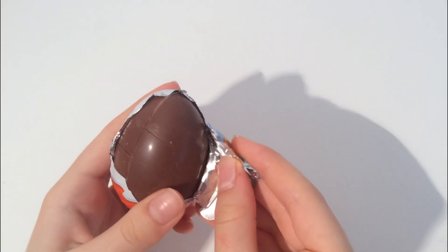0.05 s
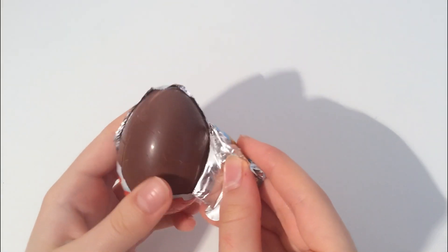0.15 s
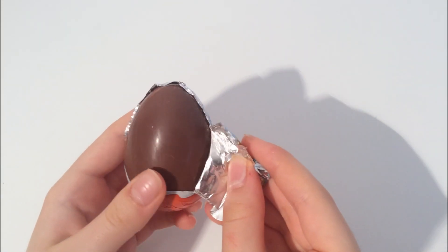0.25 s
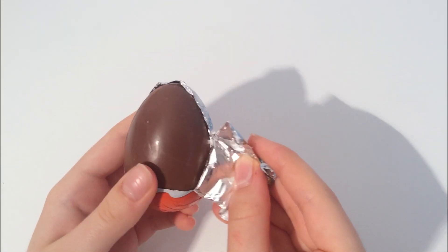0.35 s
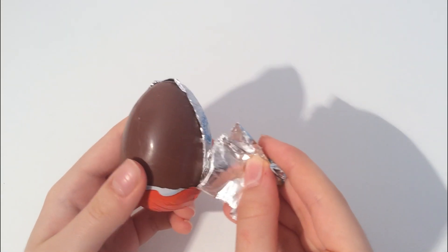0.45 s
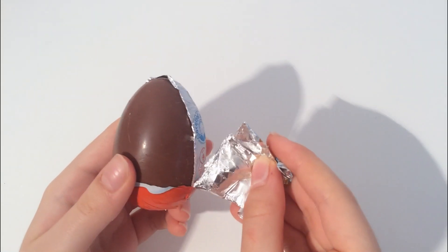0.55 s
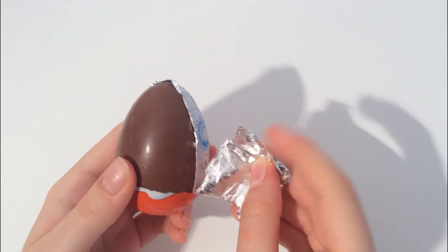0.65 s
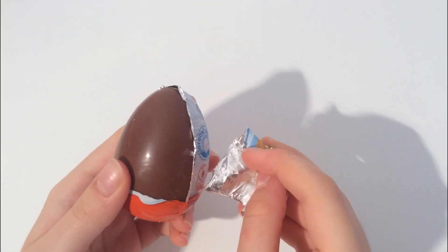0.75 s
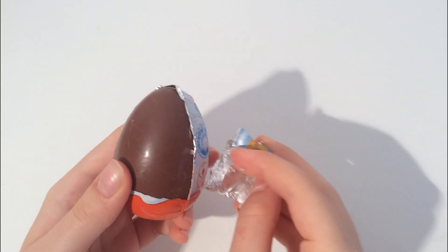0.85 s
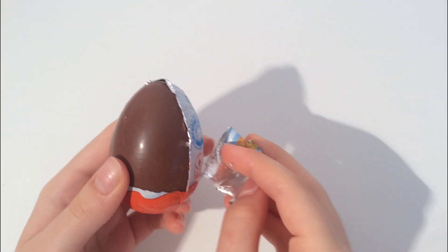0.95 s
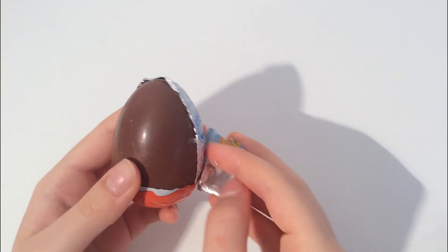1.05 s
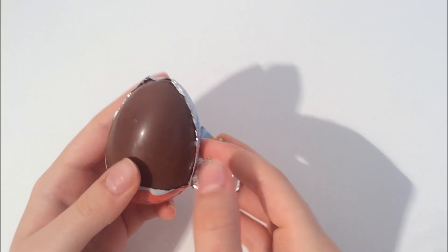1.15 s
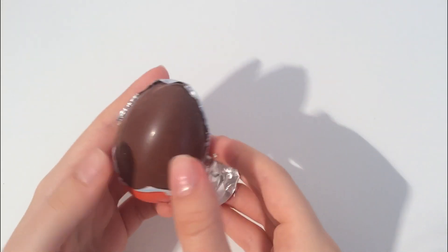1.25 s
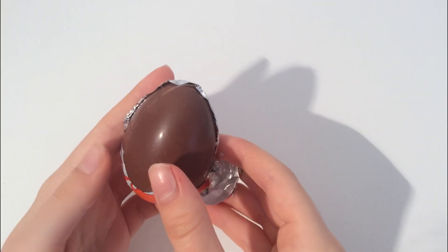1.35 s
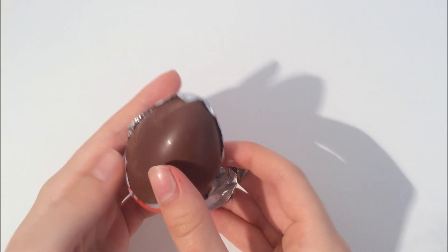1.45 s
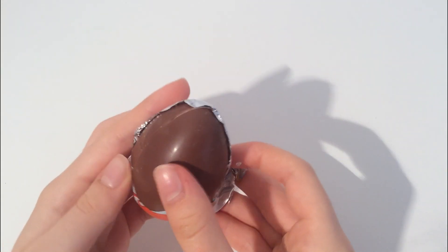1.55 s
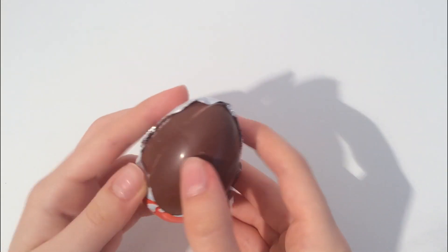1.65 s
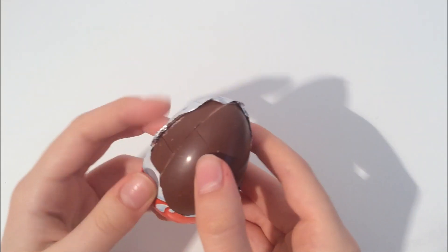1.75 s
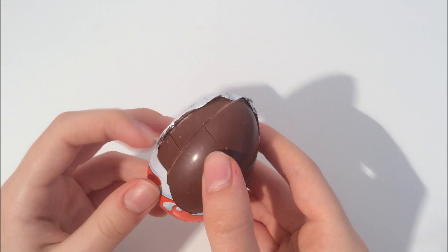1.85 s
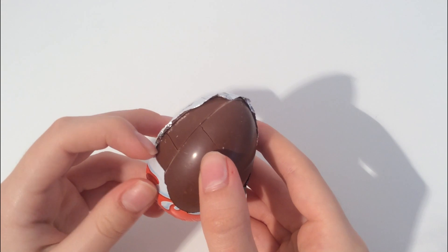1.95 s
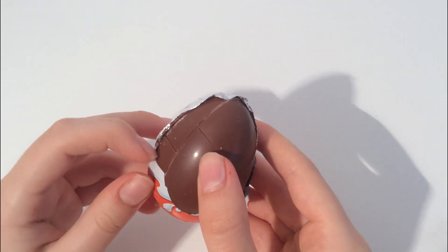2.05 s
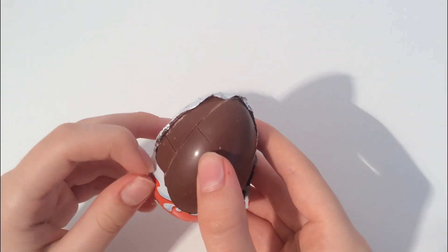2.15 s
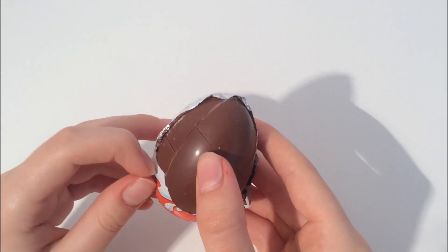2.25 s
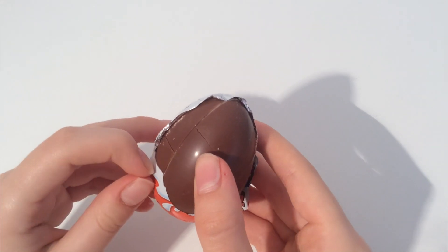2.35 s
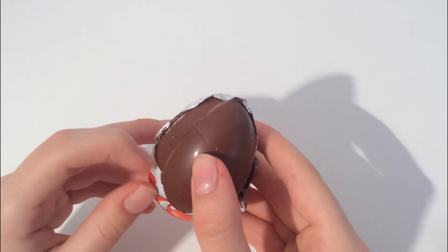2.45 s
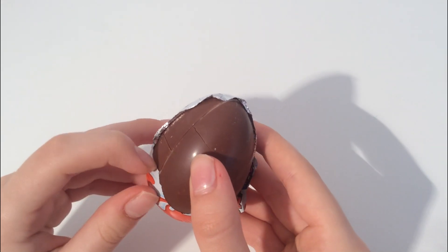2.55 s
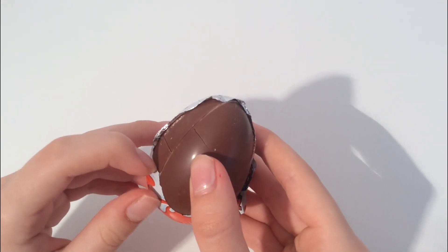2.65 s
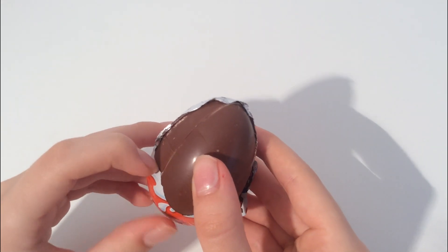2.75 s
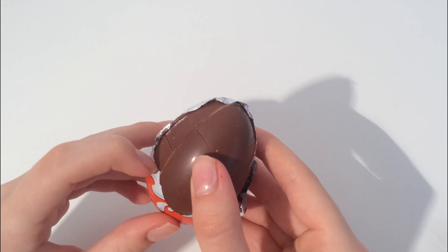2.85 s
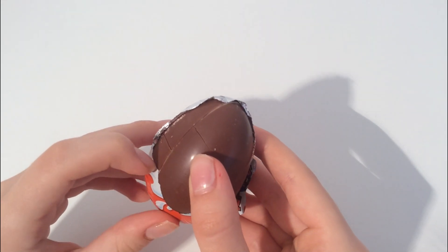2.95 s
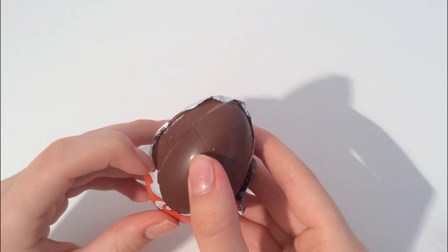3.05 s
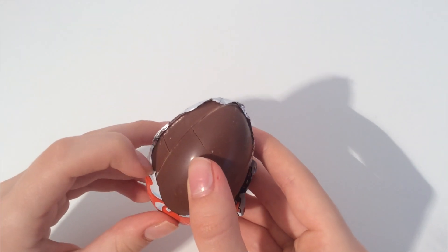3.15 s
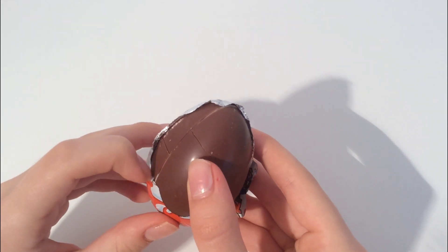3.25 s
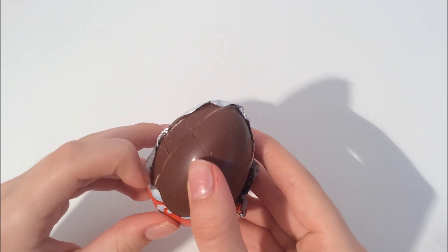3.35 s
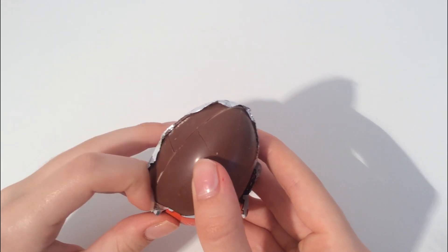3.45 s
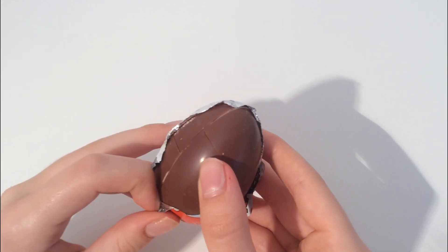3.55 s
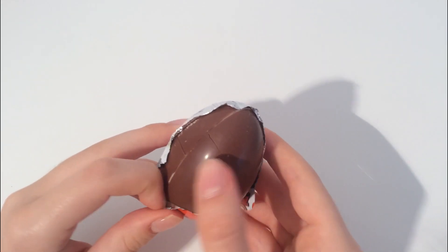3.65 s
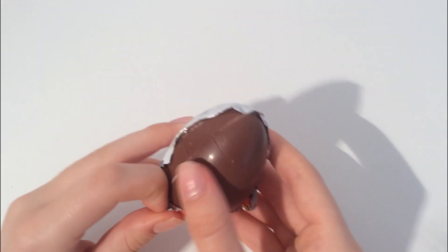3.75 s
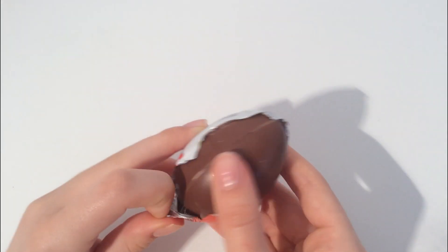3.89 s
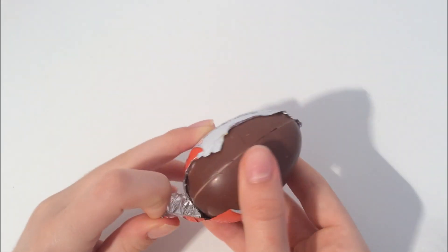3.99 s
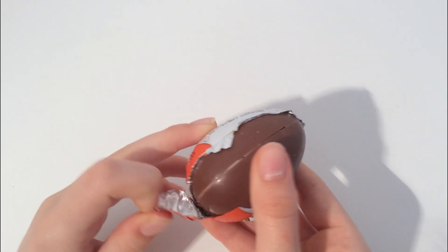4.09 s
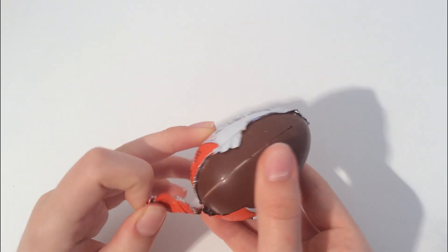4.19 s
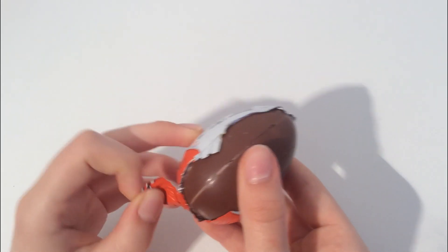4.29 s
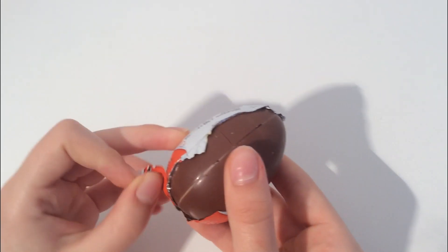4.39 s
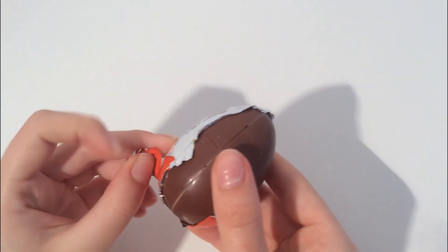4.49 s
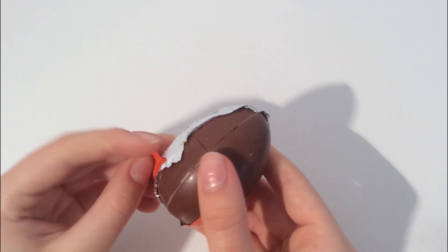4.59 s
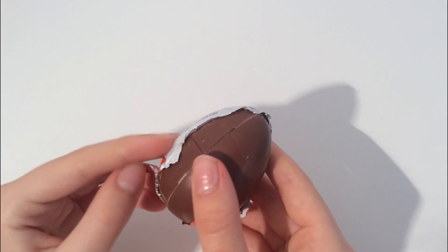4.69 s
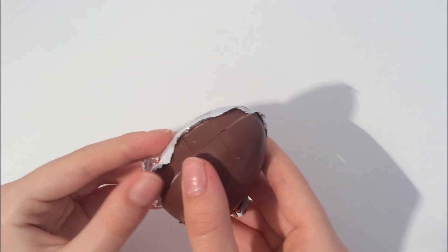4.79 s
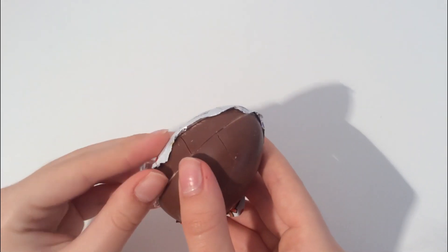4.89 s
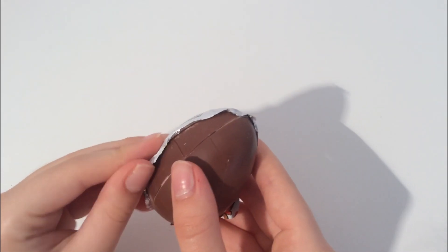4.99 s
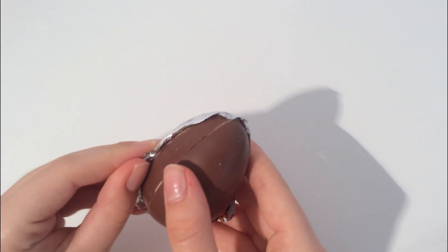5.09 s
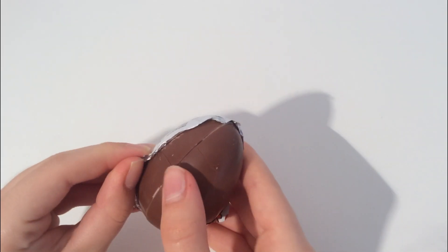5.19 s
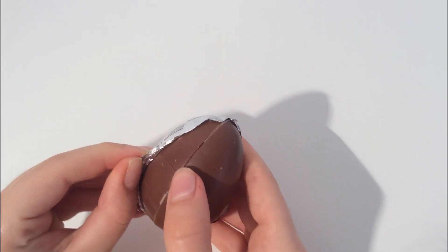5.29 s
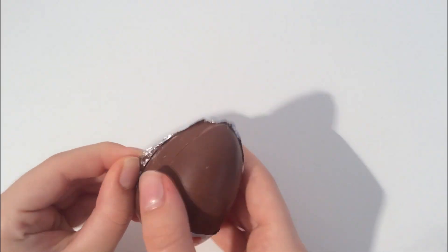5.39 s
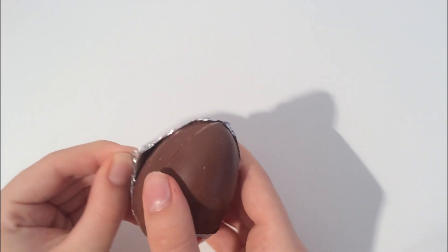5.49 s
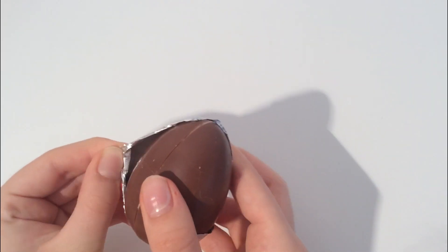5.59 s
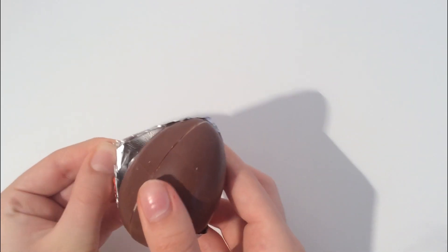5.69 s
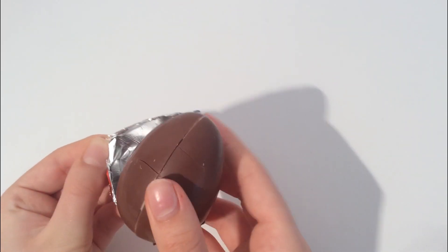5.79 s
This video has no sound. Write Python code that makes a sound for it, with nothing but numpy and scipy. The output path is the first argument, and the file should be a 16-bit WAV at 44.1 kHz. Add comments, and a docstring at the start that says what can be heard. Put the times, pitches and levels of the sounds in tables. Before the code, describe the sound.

Close to the microphone in a small quiet room, fingers peel thin foil from a hollow chocolate egg. Dense crinkling and bright clicks come in quick pulls for nearly two seconds, then almost stop. One isolated hard crack rings briefly in the lull, and shorter crackling bursts return, strongest around four and a half seconds and again near the end. Soft hiss and a faint low hum stay underneath.

```python
"""Foil peeled from a hollow chocolate egg

Fingers peel thin foil off the egg, close to a microphone in a quiet room with hiss and a faint hum.
Creases buckle one by one as sharp ringing clicks; between them the foil slides and tears, a fine
crackle of random facet clicks shaped by the pull. Pockets of foil pop as resonances, one hard crack
sets the crowded modes of the wrapper ringing, and fingers bump the shell in soft, low, damped thuds."""
import sys
import numpy as np
from scipy import signal
from scipy.fft import rfft, irfft
from scipy.io import wavfile
from scipy.ndimage import uniform_filter1d

SR = 44100
rng = np.random.default_rng(int(sys.argv[2]) if len(sys.argv) > 2 else 0)


def output_pcm(signal):
    """Save a mono or channel-first signal as 16-bit PCM at the path in sys.argv[1].

    Samples are clipped to [-1, 1] before scaling.
    """
    pcm = np.clip(np.atleast_2d(signal).T, -1, 1) * 32767
    wavfile.write(sys.argv[1], SR, np.round(pcm).astype(np.int16))


N = 257103  # length in samples

# large creases that snap: (time [s], level [dB], body near 1.5 kHz [dB], sheen near 12 kHz [dB],
# decay time of the scattered waves [ms])
CREASE_SNAPS = [(0.002, -29, -18.5, -15, 0.23), (0.0251, -29.5, -34, -2, 0.89), (0.0442, -31, -26, 2, 0.8),
                (0.1028, -38, 6.5, 2, 0.42), (0.2651, -37.5, -2, 0, 0.99), (0.2883, -33.5, 9.5, -6, 2.4),
                (0.2933, -37.5, 2, -15, 2.2), (0.3084, -36, 8, -10, 1.1), (0.3142, -32.5, 11.5, -1, 1.3),
                (0.3292, -37, 30, 14.5, 3.1), (0.3607, -35.5, 25, 6, 0.69), (0.3704, -32, 24.5, 15.5, 0.99),
                (0.421, -37, 23, 5, 0.56), (0.4248, -28.5, 7, -1, 0.94), (0.443, -34.5, -4, 6, 0.87),
                (0.4685, -27, 9.5, -31, 1), (0.5046, -37.5, 18, 1, 2.6), (0.5396, -35, -11, 1, 5.5),
                (0.663, -42, -6, -15, 3), (0.7297, -31.5, -1, -22, 3.4), (0.7356, -30.5, 5.5, -2, 1.6),
                (0.8451, -38, 5, -2, 3.3), (0.87, -36.5, 0.5, -5.5, 1.6), (0.9266, -35.5, -20, 11, 2),
                (1.017, -32, 5, 3, 0.97), (1.0273, -37, 6, -4, .8), (1.0526, -39, 14, -11, 6.7),
                (1.0894, -36, -4, 20, 1.5), (1.0939, -32.5, -0.5, -24, 0.71), (1.3161, -38.5, 7, -6, 1.9),
                (1.3594, -39.5, -1, -4, 2), (1.369, -37, 0, -8, 2.7), (1.4233, -30, -3.5, -5.5, 2),
                (1.4656, -34, 3.5, -7.5, 1.5), (1.6162, -47, 0, -12, 1.6), (1.6224, -33, -16, -17, 0.73),
                (1.6735, -29, -24, -6, 1.3), (1.6865, -34.5, 1, -5, 0.64), (1.694, -27.5, -1.5, 1.5, 6.5),
                (2.1332, -58, -12, -4, 2), (2.2241, -52.5, 0, 2.5, 0.9), (2.355, -44.5, -10, 7, 0.51),
                (2.5214, -48.5, 1, 0, 1.6), (2.7938, -30, -2, -3, 0.72), (2.7967, -38, -10, -16, 0.86),
                (3.1195, -52, -16, 11, 2), (3.226, -51.5, 3, 7, 0.86), (3.3344, -47, -5.5, -7, 0.42),
                (3.4134, -29, -11, 9, 2.8), (3.4375, -34, -12, 7.5, 4.7), (3.459, -32, 1, 9.5, 2.8),
                (3.7652, -34.5, -9.5, 2.5, 1.7), (3.8139, -48.5, 3, 3.5, 1.2),
                (3.8865, -34.5, 12, 12.5, 0.69), (3.9244, -26.5, 2, 3.5, 0.56),
                (3.9345, -27.5, 2, -1.5, 0.76), (4.003, -36.5, 15, -9, 1.4), (4.0304, -45.5, -4, 0, 0.81),
                (4.0976, -50, 5, -3, 1.2), (4.1284, -32.5, -1, -9, 4.8), (4.145, -36, -1, 7, .8),
                (4.1508, -32.5, -10, 4, 2.5), (4.1567, -28, 0, 3.5, .4), (4.1985, -45.5, 29, -15, 1.1),
                (4.2918, -51, -16, -2, 1.4), (4.3884, -46.5, 12, 10, 0.53), (4.3945, -39.5, -7.5, -6, 2.1),
                (4.461, -25.5, -6, -4.5, 2.5), (4.4645, -30, -3, -5, 0.93), (4.4722, -22, -4, 2.5, 1.3),
                (4.4789, -27, -4, 2, 0.87), (4.5071, -33, 13, 7.5, 7.5), (4.7004, -43, 6.5, 0.5, 3),
                (4.7963, -44, 3, 0, 11), (4.851, -54, -9, -6, 1.6), (4.9004, -58, 5, -2, 3),
                (4.9707, -41, -19, 10, 7.7), (5.149, -36.5, -17, 0.5, 5.7), (5.2938, -39.5, 12.5, 3, 0.43),
                (5.3037, -34, -1, 2, 0.54), (5.4033, -38, 5, -3, 2.5), (5.4438, -39, -42, -3, 6.4),
                (5.4821, -33, -10, -2.5, 1.2), (5.525, -35, -10, 7, 2.2), (5.6545, -26, -0.5, 4, 2.7),
                (5.7324, -29, -27, -0.5, 0.76), (5.766, -39, -3, 16, 1.2)]
# pockets of foil that flip over: (time [s], level [dB], pitch [Hz])
POCKET_POPS = [(.0252, -46, 1200), (.4685, -55, 700), (0.579, -51, 810), (0.734, -38, 1710),
               (3.457, -51, 1370), (4.0031, -42.5, 1320), (4.199, -47.5, 950), (4.4797, -56, 466),
               (4.5084, -53, 1610), (5.128, -54.5, 820), (5.291, -64, 1220)]
# fingers bumping the shell: (time [s], relative level [dB], pitch [Hz])
SHELL_BUMPS = [(.469, -61, 410), (.736, -63.5, 427), (1.72, -75.5, 310), (3.125, -65, 107),
               (3.42, -66.5, 102), (3.479, -75, 99), (4.489, -61.5, 67.6), (4.504, -67.5, 256),
               (5.311, -67.5, 99), (5.317, -66, 262)]
# spectrum of the moving foil: (frequency [Hz], relative level [dB per Hz])
FOIL_SPECTRUM = [(150, -48), (250, -28.5), (430, -23.5), (651, -21.5), (880, -11.5), (1150, -11),
                 (1450, -7.5), (1610, -12), (2200, -7.5), (2910, -3), (3650, -3.5), (6140, 1), (7700, 0),
                 (10000, -2.5), (12500, 0.5), (15200, -3), (16000, -1)]
# resonances of the wrapped shell under a sliding finger: (frequency [Hz], width [Hz], lift [dB])
SHELL_MODES = [(5900, 280, -1), (7160, 480, 1.5), (13100, 500, 1)]
# reverberation time of the room: (frequency [Hz], time to fall 60 dB [s])
ROOM_DECAY = [(200, 0.84), (1200, 0.18), (3000, 0.11), (7000, 0.15), (15000, 0.16)]
# spectrum of the background: (frequency [Hz], relative level [dB per Hz])
HISS_SPECTRUM = [(15, -45), (25, -9.5), (92, -4), (242, -10.5), (301, -13), (416, -12.5), (451, -13),
                 (840, -17.5), (1040, -17.5), (1520, -21), (2350, -21.5), (3920, -21), (13600, -23.5),
                 (14800, -17), (16000, -35.5)]
# foil patches held taut that sing as they slide:
# (start [s], end [s], middle pitch [Hz], width [Hz], lift [dB])
TAUT_PATCHES = [(0.17, 0.273, 3070, 1600, 12.5), (1.09, 1.247, 4400, 700, 11), (4.567, 4.73, 5100, 603, 8),
                (4.783, 5.207, 2740, 447, 12.5), (4.96, 5.2, 5900, 750, 12)]
# modes of the taut wrapper that ring after the hard crack: (frequency [Hz], width [Hz], lift [dB])
WRAPPER_MODES = [(2400, 600, 11), (7350, 4000, 16)]
# pulls of the fingers: (start [s], end [s], relative level [dB], hardest moment [share of pull 0-1],
# body [dB], sheen [dB], part that crumples rather than slides [0-1])
FINGER_PULLS = [(0.0, 0.109, -48, 0.27, 5, -12, 0.33), (0.114, 0.271, -50, 0.51, 9.5, -6.5, 0.94),
                (0.278, 0.427, -49, 0.58, 15.5, -19, 1), (0.381, 0.482, -44.5, 0.83, 10.5, -5, .85),
                (0.476, 0.577, -41.5, 0.27, 9.5, -9.5, 0.63), (0.695, 0.831, -44.5, 0.42, 0, -3.5, 0.46),
                (0.828, 0.923, -50, 0.62, 1.5, -8.5, 0), (0.927, 0.971, -39, 0.82, 0, -8, 0.4),
                (1.013, 1.113, -39.5, 0.14, 0.5, -6.5, 0.54), (1.11, 1.27, -57, 0.22, 2.5, -4, 0),
                (1.255, 1.401, -49, 0.46, 4, -9, 0.23), (1.42, 1.599, -45.5, 0.52, -0.5, -12.5, 0.58),
                (1.612, 1.734, -41.5, 0.86, -2.5, -5.5, 0.54), (1.842, 1.922, -51.5, .6, 1, -0.5, 0.53),
                (3.32, 3.375, -58, 1, -15, 1, 1), (3.403, 3.472, -42.5, 0.34, -3.5, 5.5, .45),
                (3.651, 3.701, -57, 0.74, 0.5, -1.5, 0.17), (3.762, 3.833, -62, .15, -12, -1, 1),
                (3.833, 3.883, -53, 0.85, -3, -4, 0.82), (3.879, 4.005, -42, 0.28, -0.5, -6, 0.54),
                (4.026, 4.15, -58, 0.15, 5, -2, 0.94), (4.121, 4.182, -37.5, 0.52, 1.5, -3, 0.94),
                (4.308, 4.339, -44.5, 0.53, 0.5, -7.5, 0.64), (4.436, 4.525, -40.5, 0.27, -4, -1.5, 0.5),
                (4.572, 4.683, -48.5, 0.47, -2, -2.5, 0), (4.676, 4.722, -48, 0.94, 11.5, 1.5, .06),
                (4.79, 4.86, -68, .1, -1, -4, .2), (4.963, 4.988, -55.5, .2, 9.5, 12, 0.4),
                (5.011, 5.211, -52.5, 0.64, 0.5, 0.5, 0.15), (5.22, 5.373, -51.5, 0.42, -1, -5, 0.84),
                (5.374, 5.474, -49, 0.27, 2.5, -2, 0.1), (5.5, 5.644, -42.5, 0.69, -1, -4.5, 0.84),
                (5.646, 5.747, -37, 0.47, 0.5, -7, 0.37), (5.761, 5.859, -40.5, 0.6, 1, -9.5, 0.62)]


def amp(db):
    """Decibel law: amplitude ratio of a level in dB."""
    return 10 ** (np.asarray(db) / 20)


def evened(x):
    """Root-mean-square normalisation: scales to rms 1."""
    return x / np.sqrt(np.mean(x ** 2) + 1e-20)


def read(points, hz):
    """Logarithmic frequency scale: interpolates a spectrum along it."""
    f, value = np.transpose(points)
    return np.interp(np.log(hz + 1), np.log(f + 1), value)


def add(mix, s, sound):
    """Superposition: mixes a sound in at time s."""
    part = mix[max(round(s * SR), 0):][:len(sound)]
    part += sound[:len(part)]


def hump(hz, centre, width):
    """Lorentzian resonance curve: 1 at its centre, one half at half a width away."""
    return 1 / (1 + (2 * (hz - centre) / width) ** 2)


def causal(db):
    """Minimum phase: a spectrum with these gains whose response starts at once and then dies away."""
    log_gain = np.log(amp(np.maximum(db, db.max() - 80)))
    circle = np.concatenate([log_gain, log_gain[-2:0:-1]])
    return np.exp(np.conj(signal.hilbert(circle)))[:len(db)]


def resonate(x, hz, width):
    """Damped oscillator: one complex pole rings at hz, faster to decay the wider it is."""
    pole = np.exp((2j * np.pi * hz - np.pi * width) / SR)
    return signal.lfilter([1], [1, -pole], x).real


def foil_colour(hz, body_db, sheen_db):
    """Size and pitch: large loose facets add body, small taut ones add sheen."""
    body = read([(400, 0.36), (1300, 1), (2300, 0.84), (4400, 0)], hz)
    sheen = read([(7000, 0.029), (11500, 0.99)], hz)
    return read(FOIL_SPECTRUM, hz) + body_db * body + sheen_db * sheen


def background(hiss_db=-72, hum_hz=100, hum_db=-84):
    """Stationary noise: shaped hiss and low room rumble, with a faint sinusoidal mains hum."""
    hz = np.fft.rfftfreq(N, 1 / SR)
    hiss = irfft(rfft(rng.standard_normal(N)) * amp(read(HISS_SPECTRUM, hz)), N)
    hum = np.sin(2 * np.pi * hum_hz * np.arange(N) / SR)
    return amp(hiss_db) * evened(hiss) + amp(hum_db) * hum


def pulling(t, swell_db=11.5, ease_db=10, grip_s=0.0021, let_go_s=0.0027,
            settle_db=-22.5, settle_db_per_s=123):
    """Effort and creep: level, body, sheen and crumple share at times t as pulls swell, ease and settle."""
    grid = np.arange(0, N, 64) / SR
    start, end, db, hardest, *character = np.transpose(FINGER_PULLS)[:, :, None]
    along = np.clip((grid - start) / (end - start), 0, 1)
    hardest = np.clip(hardest, .02, .98)
    swell = swell_db * (1 - along / hardest)
    ease = ease_db * (along - hardest) / (1 - hardest)
    effort_db = db - np.maximum(swell, ease)
    # the foil keeps creeping after each pull
    after = np.maximum(grid - end, 0)
    creep = amp(db + settle_db - settle_db_per_s * after)
    moving = amp(effort_db) * np.exp(-after / let_go_s) + creep
    power = (moving * np.clip((grid - start) / grip_s, 0, 1)) ** 2 + 1e-16
    # overlapping pulls add in power; their character is the power-weighted mean
    total = power.sum(0)
    controls = [10 * np.log10(total)] + [(power * c).sum(0) / total for c in character]
    return [np.interp(t, grid, c) for c in controls]


def crackle(per_s, spread_db, ring_s, tone=0.72, count=32, size=512):
    """Random impulse train: tiny facets, each with its own pitch and short ring, click; a few are large."""
    t, out = np.arange(size) / SR, np.zeros(N)
    force = np.minimum(rng.exponential(1, N), 3)
    sizes = amp(spread_db * force) * (rng.random(N) < per_s / SR)
    facet = rng.integers(0, count, N)
    for k, hz in enumerate(np.geomspace(1300, 15000, count)):
        click = rng.standard_normal(size) * np.exp(-t / ring_s)
        ring = np.sin(2 * np.pi * hz * t) * np.exp(-t * hz / 5)
        grain = evened(click) + tone * np.sqrt(hz / 6000) * evened(ring)
        out += signal.oaconvolve(sizes * (facet == k), grain)[:N]
    return evened(out)


def rub(level_db=-1.0, catch_db=2.5, patchy_db=2.5, taut_rise=0.095, size=512):
    """Stick-slip friction: fine slips and coarser crumpling, coloured by the foil as the grip shifts."""
    t = np.arange(N) / SR
    db, body_db, sheen_db, crumple = pulling(t)
    share = np.clip(crumple, 0, 1)
    sliding = np.sqrt(1 - share) * crackle(6000, 2.6, 0.00054)
    crumpling = np.sqrt(share) * crackle(480, 4.9, 0.002)
    hz, at, z = signal.stft(sliding + crumpling, SR, nperseg=size, noverlap=size * 3 // 4)
    body_at = np.interp(at, t, body_db)[:, None]
    sheen_at = np.interp(at, t, sheen_db)[:, None]
    colour = foil_colour(hz, body_at, sheen_at)
    colour += sum(lift * hump(hz, f, width) for f, width, lift in SHELL_MODES)
    # a taut patch climbs in pitch, by the share taut_rise, as it is stretched
    for start, end, f, width, lift in TAUT_PATCHES:
        along = (at[:, None] - start) / (end - start)
        pitch = f * (1 + taut_rise * (along - .5))
        colour += lift * ((along > 0) & (along < 1)) * hump(hz, pitch, width)
    # the facets in play change as the foil folds
    patches = uniform_filter1d(rng.standard_normal(colour.shape), size=14, axis=0)
    patches = uniform_filter1d(patches, size=5, axis=1)
    gain = amp(colour + patchy_db * evened(patches))
    gain /= np.sqrt(np.mean(gain ** 2, axis=1, keepdims=True))
    sound = signal.istft(z * gain.T, SR, nperseg=size, noverlap=size * 3 // 4)[1][:N]
    # the foil catches and slips every few milliseconds
    catches = uniform_filter1d(rng.standard_normal(N), size=260)
    catches = np.clip(evened(catches), -2, 2)
    return sound * amp(db + level_db + catch_db * catches)


def snap(db, body_db, sheen_db, ring_ms, size=2048, scatter=0.33, flutter=0.044, flutter_s=0.0049,
         facet_hz=5614, facet_spread_oct=0.455, facet_db=11, sharpness=12):
    """Buckling: a facet clicks and rings at its own pitch; bending waves scatter from creases around it."""
    t, hz = np.arange(size) / SR, np.fft.rfftfreq(size, 1 / SR)
    span = .0036 * SR  # the level is the rms over 3.6 ms
    pitch = facet_hz * 2 ** (facet_spread_oct * rng.standard_normal())
    ring_s = max(ring_ms, .2) / 1000
    fade = scatter * np.exp(-t / ring_s) + flutter * np.exp(-t / flutter_s)
    waves = rng.standard_normal(size) * fade
    waves[0] = rng.choice([-1, 1])  # the buckling itself, either way
    colour = foil_colour(hz, body_db, sheen_db) + facet_db * hump(hz, pitch, pitch / sharpness)
    click = irfft(rfft(waves) * causal(colour))
    return amp(db) * click * np.sqrt(span) / np.linalg.norm(click)


def snaps():
    """Successive buckling: the large creases give way one by one."""
    out = np.zeros(N)
    for s, *crease in CREASE_SNAPS:
        add(out, s, snap(*crease))
    return out


def small_snaps(count=300, spread_db=6, colour_spread_db=5, sheen_lift_db=3, ring_ms=1.0):
    """Random buckling under load: small creases give way as hard as the foil is being pulled."""
    out, chance = np.zeros(N), rng.uniform(-1.1, 1, (count, 4))
    times = (np.arange(count) + 1 + chance[:, 0]) * N / SR / count
    for s, db, body_db, sheen_db, _, (_, force, body, sheen) in zip(times, *pulling(times), chance):
        level = db + spread_db * force
        crease_body = body_db + colour_spread_db * body
        crease_sheen = sheen_db + sheen_lift_db + colour_spread_db * sheen
        add(out, s, snap(level, crease_body, crease_sheen, ring_ms))
    return out


def pops(ring_s=0.0021, sharpness=2.5, size=2048):
    """Snap-through of a dome: a wider pocket flips and excites a broad resonance, a short hollow tock."""
    t, out = np.arange(size) / SR, np.zeros(N)
    for s, db, hz in POCKET_POPS:
        push = 0.095 * rng.standard_normal(size) * np.exp(-t / ring_s)
        push[0] = 1
        width = hz / sharpness
        swing = resonate(resonate(push, hz, width), hz, width)
        tock = np.diff(swing, prepend=0)
        add(out, s, amp(db) * tock / np.sqrt(np.mean(tock[:size // 8] ** 2)))
    return out


def bumps(decay_s=0.01, rise_s=0.001, size=8192):
    """Damped impact: soft fingertips give low thuds, half tone and half resonant noise."""
    t, out = np.arange(size) / SR, np.zeros(N)
    for s, db, hz in SHELL_BUMPS:
        flesh = resonate(resonate(rng.standard_normal(size), hz, hz), hz, hz)
        tone = np.sin(2 * np.pi * hz * t)
        envelope = (1 - np.exp(-t / rise_s)) * np.exp(-t / decay_s)
        add(out, s, 2 * amp(db) * (tone + evened(flesh)) * envelope)
    return out


def wrapper_ring(crack_s=2.7936, ring_db=-41, ring_t60=0.2, strike_db=13, strike_s=0.005, size=16384):
    """Modal excitation: the hard crack strikes the crowded modes of the wrapper, which then die away."""
    t, hz, out = np.arange(size) / SR, np.fft.rfftfreq(size, 1 / SR), np.zeros(N)
    colour = read(FOIL_SPECTRUM, hz)
    colour += sum(lift * hump(hz, f, width) for f, width, lift in WRAPPER_MODES)
    modes = irfft(rfft(rng.standard_normal(size)) * amp(colour))
    # strike_db is relative to the ring
    fade = amp(strike_db) * np.exp(-t / strike_s) + np.exp(-np.log(1000) * t / ring_t60)
    add(out, crack_s, amp(ring_db) * evened(modes) * fade)
    return out


def room(x, table_db=-11, table_s=.0014, wet_db=-14, size=16384):
    """Reflection and reverberation: a quick bounce off the table top and the short tail of a small room."""
    # sparse random echoes from 3 ms on
    taps = rng.standard_normal(size) * (rng.random(size) < .12) * (np.arange(size) > .003 * SR)
    hz, t, z = signal.stft(taps, SR, nperseg=256)
    decay = np.exp(-np.log(1000) * t / read(ROOM_DECAY, hz)[:, None])
    tail = signal.istft(z * decay, SR, nperseg=256)[1]
    # the path to the table changes as the hands move
    sway = np.sin(2 * np.pi * (.7 * np.arange(N) / SR + rng.random()))
    delay = np.round(table_s * SR * (1 + .3 * sway)).astype(int)
    bounce = x[np.maximum(np.arange(N) - delay, 0)]
    reverb = signal.fftconvolve(x, tail / np.linalg.norm(tail))[:N]
    return x + amp(table_db) * bounce + amp(wet_db) * reverb


def scene():
    """Superposition: foil and hands in the room, plus the wrapper's ring and the background."""
    handling = snaps() + small_snaps() + rub() + pops() + bumps()
    return (room(handling) + wrapper_ring() + background())[None]


def record(dry, low_cut_hz=36, edge_hz=16100):
    """Band limiting: a high-pass thins the lowest rumble and a steep low-pass ends the treble."""
    cut = signal.sosfilt(signal.butter(4, low_cut_hz, "high", fs=SR, output="sos"), dry)
    low_pass = signal.firwin(301, edge_hz, window=("kaiser", 8), fs=SR)
    return signal.oaconvolve(cut, low_pass[None], "same")


dry = scene()
out = record(dry)
output_pcm(out)
```